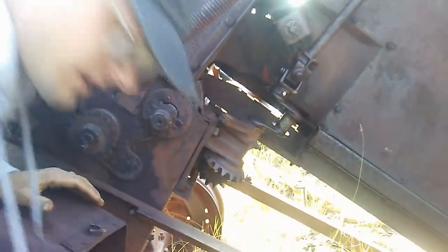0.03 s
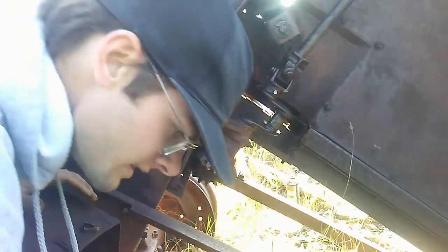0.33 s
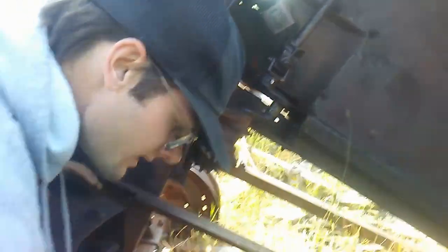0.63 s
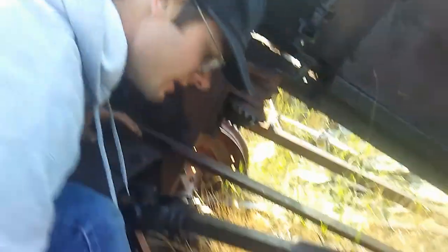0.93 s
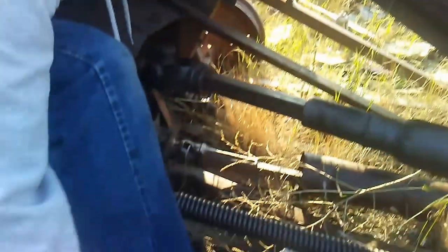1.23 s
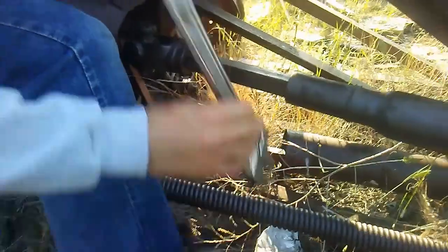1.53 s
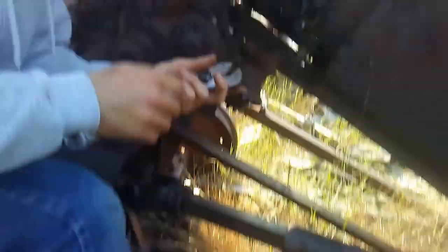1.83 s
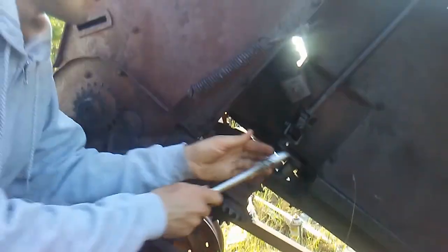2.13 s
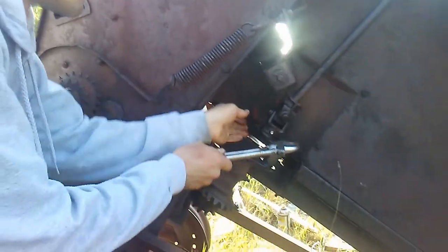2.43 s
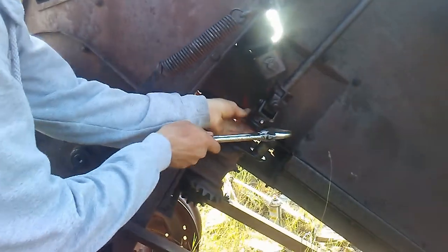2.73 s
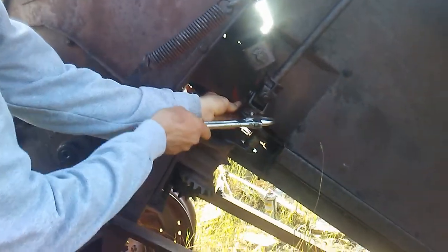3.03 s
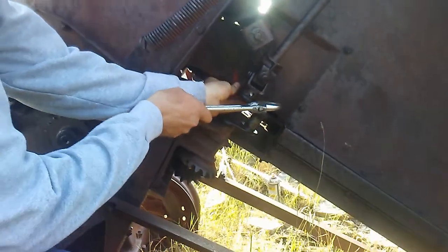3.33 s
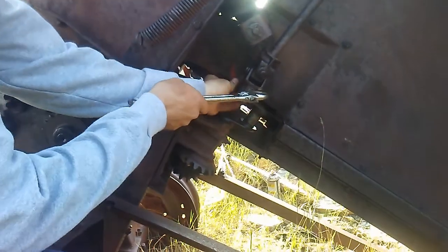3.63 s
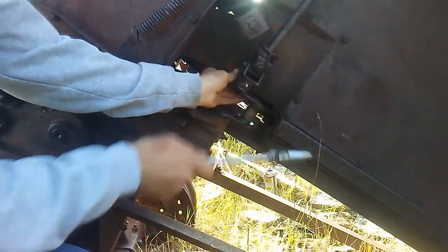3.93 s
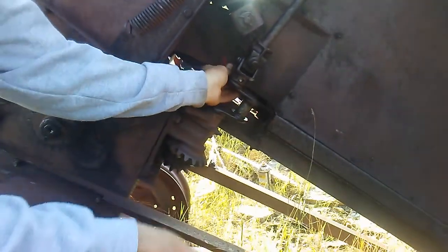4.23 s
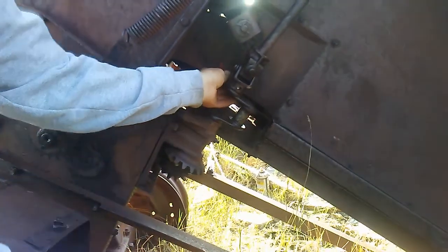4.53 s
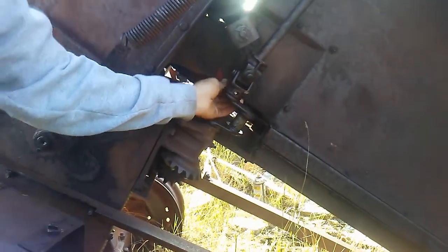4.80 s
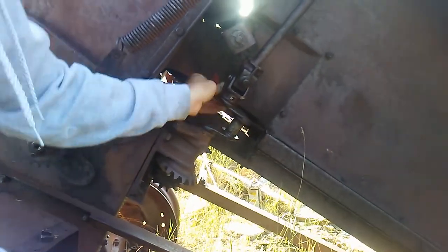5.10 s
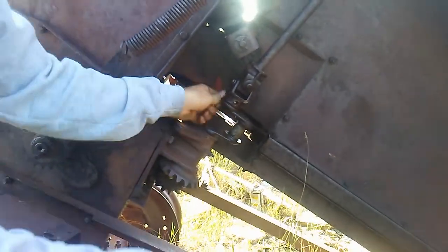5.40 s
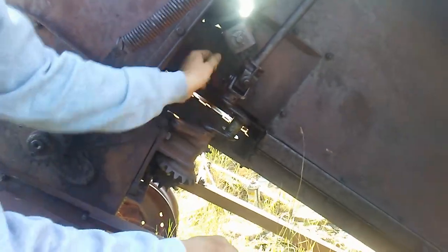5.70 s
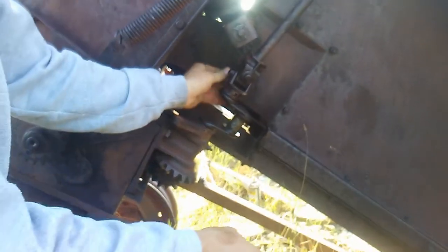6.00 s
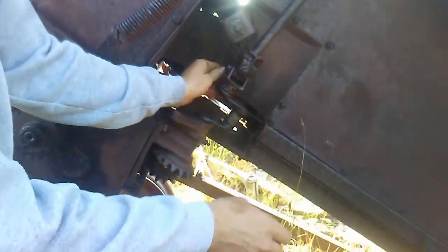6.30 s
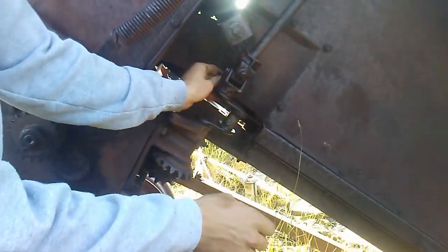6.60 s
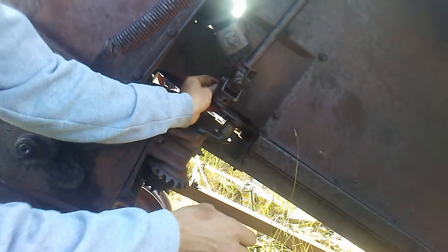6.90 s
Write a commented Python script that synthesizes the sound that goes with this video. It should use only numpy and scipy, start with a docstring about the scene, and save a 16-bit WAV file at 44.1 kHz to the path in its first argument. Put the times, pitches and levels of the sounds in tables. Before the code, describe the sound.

Outdoors, dropped and dragged metal tools clank before five quick hammer blows on a bolt, a hard close knock and small clinks.

```python
"""Outdoors at a rusty farm machine. A steel tool drops, bounces and rocks to rest; loose tools rasp and
jangle as a hammer is drawn out. It taps a bolt, then strikes it five times, and the sheet-steel wall
booms. Something knocks hard on a bracket by the microphone; the loose bolt clinks in the fingers.
Sleeves rustle, birds call far off, and a noise gate ducks the pauses."""
import sys
import numpy as np
from scipy import signal
from scipy.fft import rfft, irfft, next_fast_len
from scipy.io import wavfile
from scipy.ndimage import uniform_filter1d, minimum_filter1d, map_coordinates

SR = 44100
rng = np.random.default_rng(int(sys.argv[2]) if len(sys.argv) > 2 else 0)


def put_to_file(sound):
    """Save the sound as 16-bit audio at rate SR, in the file named by the first command-line argument."""
    columns = np.atleast_2d(sound).T  # one column per channel
    safe = np.clip(columns, -1, 1)
    whole_steps = np.round(safe * 32767)
    wavfile.write(sys.argv[1], SR, whole_steps.astype(np.int16))


N = 315315
TIME_S = np.arange(N) / SR
AGE_S = np.arange(SR) / SR  # time since a contact

# Bird whistles. Each row: start and length in seconds, first and last pitch in Hz, level in dB.
WHISTLES = [(2.06, .05, 5600, 5460, -68), (2.205, .045, 7300, 7000, -63), (2.78, .045, 5600, 5470, -66),
            (3.405, .03, 5700, 5500, -64), (4.28, .28, 2800, 2595, -54), (4.62, .21, 2160, 2078, -48.5),
            (4.95, .08, 3920, 3700, -60), (5.05, .1, 3680, 3400, -55)]
# Triple chirps. Each row: start in seconds, level in dB.
TRILLS = [(0.323, -65), (2.228, -72), (3.007, -65), (3.392, -64), (3.751, -63), (4.079, -73), (4.367, -73),
          (4.68, -73), (5.08, -72)]
# Arm movements. Each row: start and length in seconds, hiss swell and rustle levels in dB.
ARM_MOVES = [(0, 1.6, -59.5, -50.5), (2.017, 0.35, -54.5, -79), (2.949, .95, -57.5, -56.5),
             (3.966, .17, -55.5, -50.5), (4.216, 0.33, -61.5, -59), (4.629, 0.22, -63, -50.5),
             (4.858, .7, -53, -54.5)]
# Fingers rubbing rust. Each row: start and length in seconds, level in dB.
RUST_RUBS = [(5.743, 1.2, -66), (6.242, 0.32, -61.5)]
# Light contacts. Each row: start in seconds, level in dB.
WALL_BUMPS = [(4.227, -48.5), (4.662, -38.5), (5.709, -48), (6.70, -46), (6.82, -53.5), (7.048, -42.5)]
FINGER_TICKS = [(2.446, -41.5), (4.851, -28), (6.036, -44.5), (6.132, -40.5), (6.495, -44)]
BOLT_CLINKS = [(1.8792, -27), (1.9003, -34), (1.965, -38), (2.154, -34.5), (5.4056, -22.5), (5.5359, -7.5),
               (5.5603, -19), (5.6231, -21.5)]
# Thuds of hands and handle. Each row: start in seconds, level in dB, pitch in Hz.
THUDS = [(1.133, -48.5, 75), (1.2433, -27, 640), (4.854, -29.5, 260), (6.355, -40.5, 564)]
# Bolt sliding in its hole. Each row: centre and half-length in seconds, level in dB, squeak in Hz.
BOLT_SLIDES = [(5.491, 0.011, -35.5, 7900), (5.721, 0.022, -43, 10000), (6.702, 0.021, -47.5, 9740),
               (6.721, 0.01, -45, 6170), (7.145, 0.0081, -54.5, 6110)]
# Bracket knocks. Each row: start in seconds, level in dB, relative thump in dB, t60 in seconds.
KNOCKS = [(5.038, -39, -34, 0.12), (5.052, -45.5, -35, .04), (5.1897, -8, -7, 0.041),
          (5.194, -8.5, -25, 0.098), (5.2191, -15.5, -44.5, 0.053), (5.404, -29.5, -34, 0.15),
          (5.477, -27, -43, 0.26), (5.488, -27, -42, 0.092)]
# Envelope of tools dragged over each other. Each row: time in seconds, level in dB.
DRAG_LEVELS = [(0.74, -43.5), (.89, -35.5), (1.0, -27), (1.12, -36), (1.17, -32), (1.235, -46),
               (1.32, -31.5), (1.53, -47), (1.68, -56)]
# Knocks in the pile. Each row: start in seconds, level in dB, struck tool's note in Hz.
PILE_HITS = [(0.906, -10.5, 2310), (0.967, -14, 4160), (1.03, -17.5, 3920), (1.058, -19.5, 3430),
             (1.151, -19, 3380), (1.267, -15, 3600), (1.288, -17, 2210), (1.3041, -6.5, 2130),
             (1.387, -17.5, 3640), (1.4345, -10.5, 3890), (1.504, -24, 3670)]
# Tool bounces. Each row: start in seconds, level in dB, relative long ring in dB, spot's note in Hz.
BOUNCES = [(0.0, 0, -8.5, 3970), (0.037, 1, -18.5, 4360), (0.093, -1.5, -18, 4570),
           (0.1409, -6.5, -28, 3690), (0.309, -35, -2.5, 2400), (0.381, -28, -11, 3510),
           (0.547, -1.5, -14.5, 4180), (0.578, -11, -2.5, 1750), (0.595, -6.5, -12.5, 3700),
           (0.724, -22, -12, 2130)]
# Tool rocking to rest. Each row: start and end in seconds, first level in dB.
ROCKING_RUNS = [(0.151, .238, -11), (0.614, .663, -19)]
# Hammer blows. Each row: start in seconds, level in dB, relative wall level in dB.
BLOWS = [(2.714, -34.5, -4.5), (2.9378, -7, -18), (3.141, -7.5, -17), (3.3308, -7, -20), (3.5187, -6, -18),
         (3.7056, -9.5, -16)]

# Modes of the steel parts. Each row: frequency in Hz, level in dB, t60 in seconds.
TOOL_MODES = [(1572, -15, .24), (2988, -5, .17), (3600, -4, .13), (4266, -2, .16), (4900, -6, .11),
              (7187, -15, .1), (9749, -22, .12)]
TOOL_LONG_MODES = [(2313, -.5, .31), (2450, -8, .2)]
PILE_MODES = [(720, -27, 1), (1633, -11.5, 0.57), (1737, -4.5, 0.21), (2270, 0.5, 0.23), (2586, 0.5, 0.095),
              (2930, -6, 0.18), (3000, -8, 0.11), (3620, 5, 0.098), (3680, 10, 0.088), (3760, 0, 0.114),
              (4100, -6, .16), (4080, -13, 0.16), (5700, -15.5, 0.13), (6870, -13, 0.13),
              (6900, -17.5, 0.216), (8560, -12.5, 0.061)]
LOOSE_BOLT_MODES = [(1230, -6, 0.026), (2280, -3, 0.06), (3070, -22, 0.099), (3603, -2.5, 0.048),
                    (3860, -17, 0.063), (5030, -7, 0.041), (6660, -31, 0.075), (7590, 7.5, 0.0088)]
HELD_BOLT_MODES = [(1330, -18, .05), (2234, -17, .045), (3080, -15, .03), (3595, 0, .03), (3740, -2, .028),
                   (5130, -16, .025), (6250, -14, .025), (6520, -15, .025), (8888, -23, .03)]
BRACKET_MODES = [(911, -4, .11), (1204, 0, .14), (1262, -1, .14), (1446, -5, .12), (1720, 0, .1),
                 (1945, -3, .08), (2337, -6, .07), (2487, -6, .07), (2685, -6, .08), (3315, -8, .08),
                 (4459, -8, .06), (4745, -9, .06)]
WALL_MODES = [(196, -9, .6), (232, -6, .6), (286, -5, .7), (335, -1.5, .8), (616, -5, .5), (693, -1.5, .75),
              (733, -4, .6), (775, -4, .6), (890, -6, .5)]
# Decay of the wall's wash. Each row: frequency in Hz, t60 in seconds.
WALL_DECAY = [(200, 0.92), (800, 0.53), (1300, 0.33), (2500, 0.43), (4000, 0.23), (10000, 0.17)]

# Noise spectra. Each row: frequency in Hz, relative density in dB.
HISS_SPECTRUM = [(30, -15), (100, -9), (300, 7), (1000, 2), (2200, 3.5), (3000, -2), (3800, 4), (4300, -17),
                 (5000, -26), (6200, -12.5), (7800, -7), (11000, -12.5), (16000, -21.5)]
CLOTH_SPECTRUM = [(25, -15), (80, -13), (130, -16.5), (190, 3), (300, 1.5), (440, -3), (700, -8.5),
                  (1100, -13), (3500, -18.5), (5000, -38.5), (8000, -25.5), (16000, -36.5)]
RUST_SPECTRUM = [(60, -8), (250, -0.5), (650, -1), (1100, -0.5), (2200, -2), (3800, -6), (4700, -20.5),
                 (8000, -31), (16000, -32.5)]
BOOM_SPECTRUM = [(60, -38.5), (130, -25.5), (190, -5), (330, 0.5), (440, -5), (600, -3), (800, -0.5),
                 (1050, -3.5), (2400, -8), (3800, -14), (4600, -24), (8000, -22.5), (16000, -46)]
THWACK_SPECTRUM = [(150, -36), (600, -11), (900, -0.5), (1220, 3), (1500, -1), (1750, -1.5), (2500, -2),
                   (3000, -10), (3500, -1.5), (4700, -13.5), (5500, -17.5), (6800, -10.5), (10000, -27),
                   (16000, -41)]
RASP_SPECTRUM = [(200, -47.5), (700, -11.5), (1300, -9), (1750, -6), (2000, -6), (2350, 1), (3000, -13.5),
                 (3650, 3.5), (4100, -15.5), (4600, -51), (5800, -19), (7200, -9), (10000, -24),
                 (12500, -33.5), (16000, -50.5)]
CLANK_SPECTRUM = [(150, -25), (500, -6.5), (1200, -19.5), (2200, 2.5), (3000, -1), (3700, 0), (4600, -6),
                  (5500, -6), (7000, -7), (9000, -18), (12000, -38), (16000, -49.5)]
CRACK_SPECTRUM = [(150, -26.5), (400, -6), (1000, -4.5), (1500, -1.5), (3200, 6.5), (4000, 6),
                  (4450, -24.5), (5100, 4.5), (6500, 3.5), (9000, 1), (11000, -10.5), (13000, -14.5),
                  (16000, -44)]


def amp(db):
    """Decibels to gain."""
    return 10 ** (np.asarray(db) / 20)


def unit(x):
    """x at rms 1."""
    return x / np.sqrt(np.mean(x ** 2) + 1e-20)


def along(points, hz):
    """(Hz, value) points read on a log frequency axis."""
    knots_hz, values = np.transpose(points)
    return np.interp(np.log(hz + 1), np.log(knots_hz + 1), values)


def wobble(rate_hz):
    """Smooth random curve, rate_hz knots a second."""
    return map_coordinates(rng.standard_normal(int(N * rate_hz / SR) + 4), [TIME_S * rate_hz])


def noise(spectrum, size=SR):
    """Coloured noise at rms 1."""
    gains = amp(along(spectrum, np.fft.rfftfreq(size, 1 / SR)))
    return unit(irfft(rfft(rng.standard_normal(size)) * gains, size))


def fade(t60_s, attack_s):
    """Quick rise, exponential decay."""
    return np.exp(-np.log(1000) * AGE_S / t60_s) * (1 - np.exp(-AGE_S / attack_s))


def ring(modes, attack_s, scatter_db=2.5):
    """Damped modes; each contact excites them at new strengths."""
    hz, db, t60_s = np.transpose(modes)
    gains = amp(db + scatter_db * rng.standard_normal(len(db)))
    gains *= np.sqrt(2) / np.linalg.norm(gains)
    phases = rng.uniform(0, 2 * np.pi, len(db))
    return sum(gain * np.sin(2 * np.pi * mode_hz * AGE_S + phase) * fade(decay_s, attack_s)
               for gain, mode_hz, phase, decay_s in zip(gains, hz, phases, t60_s))


def resonance(x, hz, width_hz):
    """x through one resonance, at rms 1."""
    return unit(signal.lfilter(*signal.iirpeak(hz, hz / width_hz, SR), x))


def spot_note(hz, t60_s, attack_s):
    """Short noisy note of steel damped by the steel it touches."""
    return resonance(rng.standard_normal(SR), hz, width_hz=200) * fade(t60_s, attack_s)


def grains(spectrum, rate_hz, spread_db, kinds=8):
    """Dense tiny snaps of uneven size, at rms 1."""
    onsets = rng.random((kinds, N)) < rate_hz / kinds / SR
    snaps = onsets * amp(spread_db * rng.uniform(-1.23, 1, (kinds, N)))
    shapes = np.array([noise(spectrum) * fade(t60_s=.032, attack_s=.000298) for _ in range(kinds)])
    return unit(signal.fftconvolve(snaps, shapes, axes=1).sum(axis=0)[:N])


def gesture(start_s, length_s, rise_s=.03, release_s=.04):
    """Gain of one movement: rise, hold, decay."""
    rise = np.clip((TIME_S - start_s) / rise_s, 0, 1)
    return rise * np.exp(-np.maximum(TIME_S - start_s - length_s, 0) / release_s)


def add(track, start_s, sound):
    """Mix sound into track from start_s."""
    start = max(round(start_s * SR), 0)
    track[start:start + len(sound)] += sound[:N - start]


def air():
    """Faint, steady outdoor hiss."""
    return amp(-60.5) * noise(HISS_SPECTRUM, N)


def whistle(length_s, start_hz, end_hz):
    """One note that falls quickly, then levels out."""
    progress = np.linspace(0, 1, int(length_s * SR))
    hz = end_hz + (start_hz - end_hz) * (1 - progress) ** 2
    return np.sqrt(2 * np.abs(np.sin(np.pi * progress))) * np.sin(2 * np.pi * np.cumsum(hz) / SR)


def birds(chirp_gap_s=.036):
    """Distant whistles and triple chirps, fluttering on their way through the air."""
    out = np.zeros(N)
    for start_s, length_s, start_hz, end_hz, db in WHISTLES:
        add(out, start_s, amp(db) * whistle(length_s, start_hz, end_hz))
    chirp = whistle(length_s=.022, start_hz=4850, end_hz=4550)
    for start_s, db in TRILLS:
        for k in range(3):
            add(out, start_s + k * chirp_gap_s, amp(db) * chirp)
    return out * amp(2.5 * wobble(rate_hz=70))


def sleeves():
    """Arm movements rustle the sleeves' folds; the outdoor hiss swells with each movement."""
    swish = noise(HISS_SPECTRUM, N) * amp(.89 * wobble(rate_hz=45))
    rustle = unit(noise(CLOTH_SPECTRUM, N) * amp(3 * wobble(rate_hz=45)))
    return sum(gesture(start_s, length_s) * (amp(hiss_db) * swish + amp(rustle_db) * rustle)
               for start_s, length_s, hiss_db, rustle_db in ARM_MOVES)


def wall():
    """Struck sheet steel: low modes over a dense wash whose treble dies first."""
    hz, age_s, frames = signal.stft(noise(BOOM_SPECTRUM), SR, nperseg=256)
    decay = np.exp(-np.log(1000) * age_s / along(WALL_DECAY, hz)[:, None])
    wash = signal.istft(frames * decay, SR, nperseg=256)[1][:SR]
    rise = 1 - np.exp(-AGE_S / .002)
    return amp(-1) * wash * rise + amp(-6.5) * ring(WALL_MODES, attack_s=.008, scatter_db=4)


def handling():
    """Hands on the machine: rust crackles, the bumped wall murmurs, fingers tick, the handle thuds."""
    rubbing = sum(amp(db) * gesture(start_s, length_s) for start_s, length_s, db in RUST_RUBS)
    out = rubbing * grains(RUST_SPECTRUM, rate_hz=260, spread_db=7.5)
    soften = signal.butter(1, 1300, fs=SR, output="sos")
    hand_damping = fade(t60_s=1.4, attack_s=.0016)
    for start_s, db in WALL_BUMPS:
        add(out, start_s, amp(db + 3.5) * signal.sosfilt(soften, wall()) * hand_damping)
    for start_s, db in FINGER_TICKS:
        add(out, start_s, amp(db - 6) * noise(RUST_SPECTRUM) * fade(t60_s=.034, attack_s=.00114))
    for start_s, db, hz in THUDS:
        thud = resonance(noise(HISS_SPECTRUM), hz, width_hz=hz / 2)
        add(out, start_s, amp(db) * thud * fade(t60_s=22 / hz, attack_s=.00084))
    return out


def loose_bolt():
    """Light contacts tick and ring, damped by the fingers; sliding hisses and squeaks."""
    out = np.zeros(N)
    for start_s, db in BOLT_CLINKS:
        tick = noise(CRACK_SPECTRUM) * fade(t60_s=.023, attack_s=.00048)
        bolt = ring(LOOSE_BOLT_MODES, attack_s=.0012)
        add(out, start_s, amp(db) * (amp(-1.5) * bolt + amp(-9) * tick))
    for centre_s, half_s, db, squeak_hz in BOLT_SLIDES:
        rub = noise(HISS_SPECTRUM, N)
        hiss = resonance(rub, 4250, width_hz=530)
        squeak = resonance(np.diff(rub, prepend=0), squeak_hz, width_hz=590)
        swell = np.exp(-((TIME_S - centre_s) / half_s) ** 2 / 2)
        out += amp(db - 10.5) * swell * (hiss + amp(2) * squeak)
    return out


def bracket_knocks():
    """Hard knocks on a nearby steel bracket; the shock reaches the microphone as one low thump."""
    out = np.zeros(N)
    thump = fade(t60_s=.019, attack_s=.00027) * np.cos(2 * np.pi * 55 * AGE_S)
    for start_s, db, thump_db, t60_s in KNOCKS:
        thwack = noise(THWACK_SPECTRUM) * fade(t60_s, attack_s=.00043)
        bracket = ring(BRACKET_MODES, attack_s=.001)
        knock = thwack + amp(-5.5) * bracket + amp(thump_db) * thump + amp(-24.5) * wall()
        add(out, start_s, amp(db) * knock)
    return out


def catches(rate_hz=38, centre_hz=3640):
    """Dragged tools catch at uneven moments; each catch snaps and rings on its own note."""
    out = np.zeros(N)
    first_s, last_s = DRAG_LEVELS[0][0], DRAG_LEVELS[-1][0]
    draws = rng.standard_normal((120, 3))
    bursts = rng.standard_normal((len(draws), SR // 8))
    snap = noise(CRACK_SPECTRUM) * fade(t60_s=.0098, attack_s=.0002)
    for k, ((lag, strength, detune), burst) in enumerate(zip(draws, bursts)):
        start_s = first_s + (k + lag / 2) / rate_hz
        if first_s < start_s < last_s:
            note = resonance(burst, centre_hz * np.exp(.033 * detune), width_hz=200)
            gain = amp(np.interp(start_s, *np.transpose(DRAG_LEVELS)) + 3.5 + 2.4 * strength)
            add(out, start_s, gain * note * fade(t60_s=.05, attack_s=.0031)[:len(note)])
            add(out, start_s, gain * amp(-12) * snap)
    return out


def tool_pile():
    """Loose tools rasp, which keeps the steel jangling; each knock picks out another tool's note."""
    rasp = grains(RASP_SPECTRUM, rate_hz=1600, spread_db=9.5)
    jangle = unit(signal.fftconvolve(rasp, ring(PILE_MODES, attack_s=.0016, scatter_db=4.5))[:N])
    drag = amp(np.interp(TIME_S, *np.transpose(DRAG_LEVELS), left=-120, right=-120))
    out = drag * (amp(-6) * rasp + amp(-9.5) * jangle) + catches()
    for start_s, db, spot_hz in PILE_HITS:
        touch = noise(RASP_SPECTRUM) * fade(t60_s=.057, attack_s=.0013)
        spot = spot_note(spot_hz, t60_s=.054, attack_s=.0025)
        pile = ring(PILE_MODES, attack_s=.00096)
        hit = amp(-9.5) * pile + amp(-11) * touch + amp(-9) * spot + amp(-37) * wall()
        add(out, start_s, amp(db) * hit)
    return out


def rocking(gap_s=.0187, loss_db=1.5, ring_db=-18.5, spot_hz=3750):
    """Bounce rows of the settling tool: evenly spaced, each weaker than the last."""
    return [(contact_s, db - k * loss_db, ring_db, spot_hz)
            for start_s, end_s, db in ROCKING_RUNS
            for k, contact_s in enumerate(np.arange(start_s, end_s, gap_s))]


def dropped_tool():
    """Each bounce clanks on the machine and feeds energy into the tool's two long notes."""
    out, fed_energy = np.zeros(N), np.zeros(N)
    for start_s, db, ring_db, spot_hz in BOUNCES + rocking():
        clank = noise(CLANK_SPECTRUM) * fade(t60_s=.064, attack_s=.0002)
        spot = spot_note(spot_hz, t60_s=.053, attack_s=.0016)
        tool = ring(TOOL_MODES, attack_s=.00091)
        bounce = amp(-9.5) * clank + amp(-5) * spot + amp(-19.5) * tool + amp(-32) * wall()
        add(out, start_s, amp(db) * bounce)
        add(fed_energy, start_s, amp([db + ring_db]) ** 2)
    for hz, db, t60_s in TOOL_LONG_MODES:
        energy = np.abs(signal.fftconvolve(fed_energy, fade(t60_s, attack_s=.0015) ** 2)[:N])
        chatter_rad = .45 * wobble(rate_hz=60)
        out += amp(db) * np.sqrt(energy) * np.sin(2 * np.pi * hz * TIME_S + chatter_rad)
    return out


def hammer(rebound_s=.049):
    """Steel crack, short ring of the hand-held bolt, boom of the wall that carries it, faint rebound."""
    out = np.zeros(N)
    for start_s, db, wall_db in BLOWS:
        crack = noise(CRACK_SPECTRUM) * fade(t60_s=.034, attack_s=.00013)
        bolt = ring(HELD_BOLT_MODES, attack_s=.006, scatter_db=2)
        add(out, start_s, amp(db) * (amp(1.5) * crack + amp(12.5) * bolt + amp(wall_db) * wall()))
        rebound = resonance(crack, 7500, width_hz=2500) * np.std(crack)
        add(out, start_s + rebound_s, amp(db - 36.5) * rebound)
    return out


def noise_gate(x, threshold_db=-53, slope=1.3, depth_db=14, window_s=.013):
    """Cuts slope dB per dB below the threshold, up to depth_db."""
    power = np.abs(uniform_filter1d(x ** 2, size=int(window_s * SR)))
    below_db = threshold_db - 10 * np.log10(power + 1e-12)
    return x * amp(-np.clip(slope * below_db, 0, depth_db))


def scene():
    """All sources at one microphone; small steel parts radiate little bass."""
    bass_cut = signal.butter(3, 111, "high", fs=SR, output="sos")
    steel = signal.sosfilt(bass_cut, dropped_tool() + tool_pile() + hammer() + loose_bolt())
    return (steel + bracket_knocks() + sleeves() + handling() + birds() + air())[None]


def record(dry):
    """Noise gate, fast limiter, band limit."""
    ceiling, top_hz = .97, 16200
    gated = noise_gate(dry)
    needed_gain = np.minimum(1, ceiling / (np.abs(gated) + 1e-9))
    limited = gated * uniform_filter1d(minimum_filter1d(needed_gain, size=90), size=90)
    size = next_fast_len(N + SR // 2)
    passband = np.fft.rfftfreq(size, 1 / SR) < top_hz
    return irfft(rfft(limited, size) * passband, size)[..., :N]


dry = scene()
out = record(dry)
put_to_file(out)
```